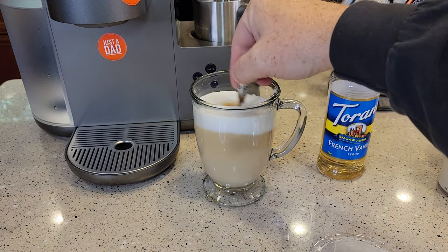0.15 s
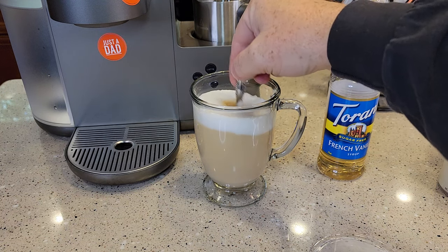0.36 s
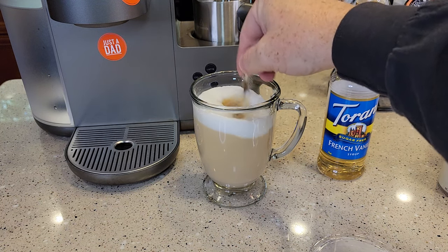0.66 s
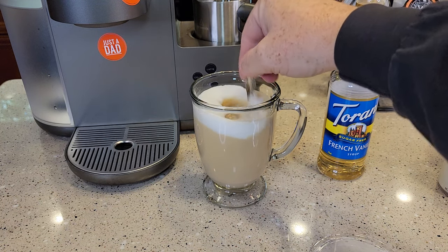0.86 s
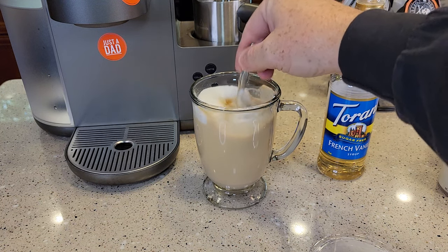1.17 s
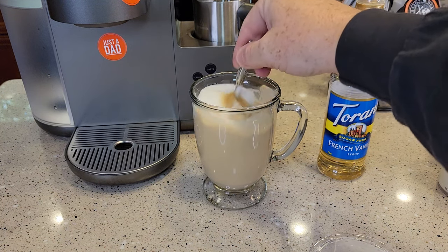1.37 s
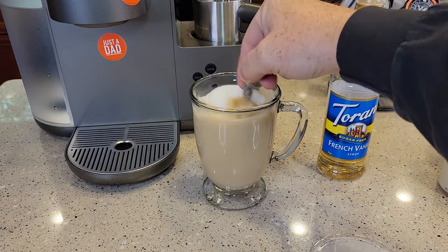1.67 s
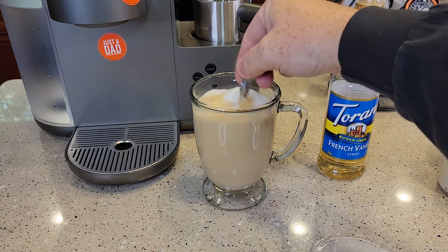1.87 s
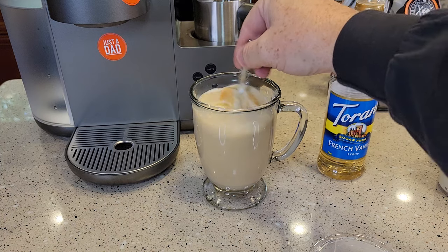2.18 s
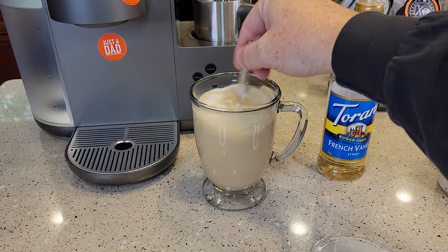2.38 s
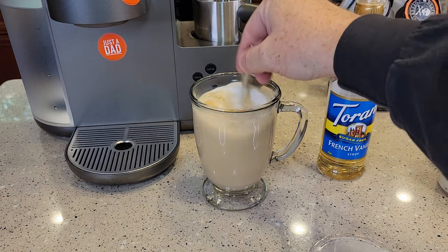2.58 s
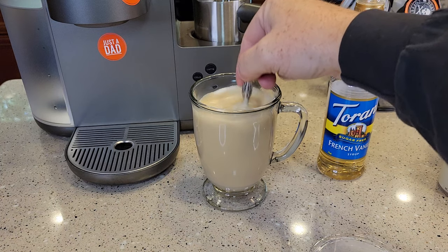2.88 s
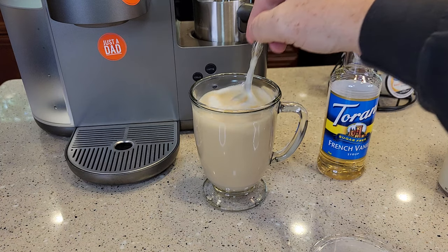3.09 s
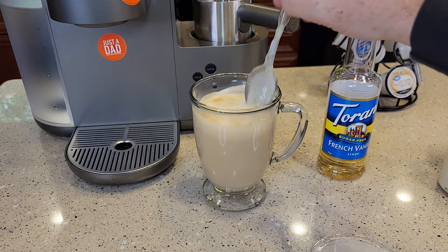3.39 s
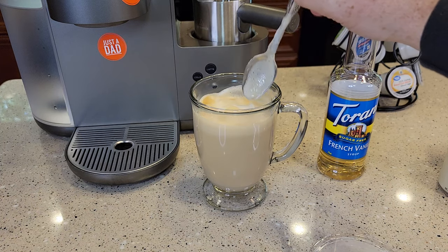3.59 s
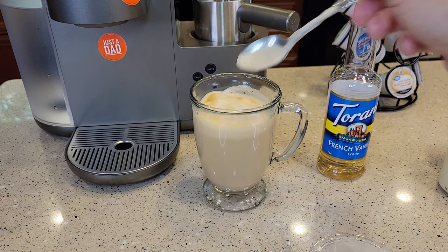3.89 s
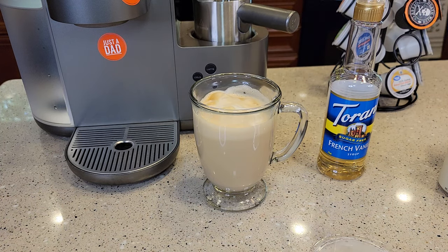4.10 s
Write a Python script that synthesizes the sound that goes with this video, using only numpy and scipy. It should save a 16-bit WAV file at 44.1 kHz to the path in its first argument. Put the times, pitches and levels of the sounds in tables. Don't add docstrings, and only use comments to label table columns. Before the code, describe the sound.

Rapid, damped glassy knocks and small bright ticks as a spoon stirs a full glass mug, ending with three sharper rim taps.

```python
import sys
import numpy as np
from scipy import signal
from scipy.fft import rfft, irfft
from scipy.io import wavfile
from scipy.ndimage import uniform_filter1d

SR = 44100
rng = np.random.default_rng(int(sys.argv[2]) if len(sys.argv) > 2 else 0)


def amplitude_ratio(level_db):
    exponent = np.asarray(level_db, float) / 20
    return 10 ** exponent


def output_pcm(signal):
    pcm = np.clip(np.atleast_2d(signal).T, -1, 1) * 32767
    wavfile.write(sys.argv[1], SR, np.round(pcm).astype(np.int16))


N = 187425

# frequency in Hz, level in dB, t60 in seconds.
THUD_MODES = [(126, -16, 0.058), (300.6, -20, 0.092), (369.2, 2, 0.036), (485.4, 9, 0.033),
              (578, -35, 0.01)]
# start in seconds, wall level in dB, tick level in dB,
# wall note in Hz, upper note of the tick in Hz.
NEAR_HITS = [(0.1095, -29, -44.5, 867, 7760), (0.293, -32, -45, 900, 7600), (0.481, -37, -47.5, 858, 9400),
             (0.6841, -26.5, -39, 899, 6200), (0.86, -25.5, -40, 875, 7300),
             (1.0455, -30, -35.5, 837, 8250), (1.2421, -19, -29, 875, 6730),
             (1.4364, -17.5, -28, 897, 6950), (1.629, -13, -24.5, 877, 6970),
             (1.8308, -6.5, -23, 868, 8540), (2.0301, -18.5, -30, 900, 6500),
             (2.2308, -21.5, -33, 870, 7800), (2.4316, -17.5, -31.5, 882, 6900),
             (2.6065, -21.5, -38.5, 867, 8100), (2.8133, -24.5, -39, 808, 8000)]
# start in seconds, wall level in dB, tick level in dB,
# wall note in Hz, t60 of that note in seconds.
FAR_HITS = [(0.1945, -42, -46, 860, 0.019), (0.408, -36.5, -43, 895, 0.039),
            (0.5675, -47.5, -51, 906, 0.039), (0.7771, -34.5, -42.5, 870, 0.024),
            (0.9626, -26, -35.5, 880, 0.042), (1.1633, -27.5, -39.5, 880, 0.022),
            (1.346, -25, -35.5, 848, 0.026), (1.5352, -24.5, -31, 800, 0.027),
            (1.7254, -25.5, -29.5, 910, 0.026), (1.919, -25.5, -29.5, 880, 0.023),
            (2.1348, -27, -30, 920, 0.018), (2.343, -25, -31.5, 880, 0.054), (2.5381, -21, -33, 900, 0.027),
            (2.7502, -35, -40, 910, 0.037)]
# start in seconds, wall level in dB, tick level in dB.
GRAZES = [(0.4895, -37, -51.5), (0.978, -55, -50), (1.3568, -40, -47), (1.5506, -54, -48),
          (1.7424, -34, -47), (1.9969, -53, -45), (2.0163, -21, -37.5), (2.208, -36, -45),
          (2.221, -33, -41), (2.5529, -37, -45), (2.757, -52, -54), (2.9033, -24, -58),
          (2.9965, -32.5, -67), (4.2278, -82, -61.5)]
THUD_SCATTER_DB = 2.5


def rms_one(x):
    return x / np.sqrt(np.mean(x ** 2) + 1e-20)


def filtered(x, order, hz, kind):
    return signal.sosfilt(signal.butter(order, hz, kind, fs=SR, output="sos"), x)


def coloured(spectrum):
    hz, db = np.transpose(spectrum)
    bins_hz = np.fft.rfftfreq(N, 1 / SR)
    gain = amplitude_ratio(np.interp(np.log(bins_hz + 1), np.log(hz), db, left=-120, right=-120))
    return rms_one(irfft(rfft(rng.standard_normal(N)) * gain, N))


def clicks(times, sizes):
    train = np.full(N, 1e-18)
    places = np.clip((np.asarray(times) * SR).astype(int), 0, N - 1)
    np.add.at(train, places, sizes)
    return train


def ring(x, hz, t60):
    r = amplitude_ratio(-60 / (t60 * SR))
    w = 2 * np.pi * hz / SR
    return signal.lfilter([0, np.sin(w)], [1, -2 * r * np.cos(w), r * r], x)


def struck(times, levels_db, modes, rise_t60, scatter_db):
    out = np.zeros(N)
    chance = rng.standard_normal((len(times), len(modes)))
    for (hz, db, t60), luck in zip(modes, chance.T):
        blows = clicks(times, amplitude_ratio(levels_db + db + scatter_db * luck))
        out += ring(blows, hz, t60) - ring(blows, hz, rise_t60)
    return out


def note(times, levels_db, pitches_hz, t60s, rise_t60):
    out = np.zeros(N)
    age = np.arange(SR // 5) / SR
    starts = (times * SR).astype(int)
    for start, level_db, hz, t60 in zip(starts, levels_db, pitches_hz, t60s):
        shape = amplitude_ratio(-60 * age / t60) - amplitude_ratio(-60 * age / rise_t60)
        sine = np.sin(2 * np.pi * hz * age)
        out[start:start + len(age)] += (amplitude_ratio(level_db) * shape * sine)[:N - start]
    return out


def crack(times, levels_db, low_hz, high_hz, t60):
    fade = signal.lfilter([1], [1, -amplitude_ratio(-60 / (t60 * SR))], clicks(times, amplitude_ratio(levels_db)))
    return filtered(fade * rng.standard_normal(N), 4, [low_hz, high_hz], "band")


def murmur():
    # time in seconds, slosh level in dB.
    swirl = [(0.0, -48.5), (0.25, -67.5), (0.73, -62), (1.08, -58), (1.51, -49), (1.83, -46), (2.1, -49),
             (2.93, -47.5), (3.6, -49.5), (3.86, -60.5), (4.25, -74)]
    # frequency in Hz, level in dB per Hz.
    slosh_spectrum = [(40, -26.5), (150, 4.5), (400, 4), (900, 5.5), (1500, -2), (1830, -20), (1950, -49),
                      (2400, -52)]
    foam_spectrum = [(2400, -1), (3400, 1.5), (4600, 8), (5600, -3.5), (7000, -5.5), (10000, -14.5)]
    hum_spectrum = [(18, -50), (30, -35), (129, -17.5), (160, -8), (300, -6.5), (480, -4.5), (653, -7.5),
                    (2600, -49)]
    air_spectrum = [(1530, -60.5), (2600, -17), (3440, -9), (4890, -5.5), (5310, -4.5), (7260, -16),
                    (14100, -27.5), (16000, -34)]
    hum_db, air_db, flicker_db = -56, -75.5, 2.2
    foam_at_db, foam_follows = -74.5, 1
    s, slosh_db = np.transpose(swirl)
    foam_db = foam_at_db + foam_follows * (slosh_db + 47.5)
    wander = uniform_filter1d(rng.standard_normal(N), size=700)
    flicker = rms_one(uniform_filter1d(wander, size=700))
    t = np.arange(N) / SR
    slosh = coloured(slosh_spectrum) * amplitude_ratio(np.interp(t, s, slosh_db) + flicker_db * flicker)
    foam = coloured(foam_spectrum) * amplitude_ratio(np.interp(t, s, foam_db))
    room = amplitude_ratio(hum_db) * coloured(hum_spectrum) + amplitude_ratio(air_db) * coloured(air_spectrum)
    return room + slosh + foam


def kitchen(x):
    # octave centre in Hz, t60 in seconds, energy of the whole tail in dB.
    octaves = [(200, 0.21, 1), (458, 0.42, -5.5), (910, .38, -18.5), (1970, 0.36, -1.5), (3370, 0.47, -7.5),
               (6500, 0.38, -9.5), (11820, 0.29, -6)]
    first_wall_s, build_up_s = .005, .007
    age = np.arange(int(.7 * SR)) / SR
    onset = np.clip((age - first_wall_s) / build_up_s, 0, 1)
    echo = 0
    for hz, t60, db in octaves:
        noise = filtered(rng.standard_normal(len(age)), 2, [hz / np.sqrt(2), hz * np.sqrt(2)], "band")
        tail = noise * amplitude_ratio(-60 * age / t60) * onset
        echo = echo + amplitude_ratio(db) * tail * np.sqrt(2 * np.log(1000) / t60 / SR)
    return signal.fftconvolve(x, echo)[:N]


def jolts():
    # start in seconds, thud level in dB, deep push in dB relative to the thud.
    foot_jolts = [(0.111, -34, -36), (0.294, -36, -32), (0.6855, -28.5, -37), (1.726, -35, -44),
                  (1.832, -21, -30), (2.032, -21, -52), (2.233, -38, -37), (2.345, -34, -38),
                  (2.61, -31, -35), (2.83, -30, -35), (3.292, -35.5, -15), (3.611, -21.5, -30)]
    push_hz, push_t60_s, push_rise_s = 36, .15, .03
    s, thud_db, push_db = np.transpose(foot_jolts)
    thud = struck(s, thud_db - 5.0, THUD_MODES, 0.005, scatter_db=THUD_SCATTER_DB)
    blows = clicks(s, amplitude_ratio(thud_db + push_db))
    push = ring(blows, push_hz, push_t60_s) - ring(blows, push_hz, push_rise_s)
    return filtered(thud, 3, 170, "high") + push


def touches(rows, kind):
    shares = {"near": (-8.5, -10), "far": (-18.5, -12), "graze": (-28.5, -10), "bump": (-13.5, -44),
              "drag": (-17, -5.5)}
    loud_wall_db, upper_per_db, thud_per_db = -17.5, -0.25, 0.08
    s, wall_db, hz, t60 = np.transpose(rows)
    force_db = wall_db - loud_wall_db
    upper_db = shares[kind][0] + upper_per_db * force_db
    thud_db = shares[kind][1] + thud_per_db * force_db
    return np.transpose([s, wall_db, upper_db, thud_db, hz, t60])


def all_knocks():
    # start in seconds, wall level in dB, wall note in Hz, t60 in seconds.
    bumps = [(0.126, -36.5, 905, 0.038), (0.168, -41, 884, 0.013), (0.365, -38.5, 880, 0.069),
             (0.445, -42.5, 870, 0.042), (0.515, -39, 885, .06), (0.64, -44, 880, 0.033),
             (0.665, -53, 880, 0.06), (0.829, -30.5, 853, 0.048), (0.932, -29.5, 880, 0.052),
             (1.025, -24, 876, 0.063), (1.054, -25, 868, 0.083), (1.115, -31, 850, .054),
             (1.202, -28, 863, 0.091), (1.308, -28, 860, 0.052), (1.398, -33.5, 900, 0.091),
             (1.505, -24.5, 877, 0.034), (1.596, -21.5, 890, 0.059), (1.699, -22, 872, 0.039),
             (1.79, -21.5, 880, 0.041), (1.938, -36, 920, 0.039), (1.994, -19.5, 881, 0.089),
             (2.197, -24, 906, 0.035), (2.296, -37.5, 867, 0.056), (2.332, -34, 890, 0.055),
             (2.399, -23, 870, 0.069), (2.599, -23, 828, 0.087), (2.726, -37.5, 910, .042),
             (2.793, -26, 870, 0.083)]
    # start in seconds, wall level in dB.
    drags = [(2.69, -50), (2.828, -36.5), (2.855, -44), (2.939, -33), (2.954, -32), (3.016, -34.5),
             (3.038, -39), (3.062, -33.5), (3.103, -37.5), (3.138, -42), (3.166, -44)]
    # start in seconds, wall level in dB, upper modes in dB and
    # counter thud in dB relative to the wall, t60 in seconds.
    rim_knocks = [
        (3.291, -8, -14, -22.5, 0.058),
        (3.453, -11, -5, -10.5, 0.063),
        (3.6088, -8.5, -7, -0.5, 0.016),
        (3.6135, -8.5, -11, -15, 0.034),
        (3.654, -34.5, 10, -4, .04),
    ]
    wall_lag_s, near_t60_s, rim_hz = 0.001048, 0.049, 859
    wall_hz, wall_t60_s = 870.5, .055
    near = [(s + wall_lag_s, db, hz, near_t60_s) for s, db, _, hz, _ in NEAR_HITS]
    far = [(s + wall_lag_s, db, hz, t60) for s, db, _, hz, t60 in FAR_HITS]
    graze = [(s, db, wall_hz, wall_t60_s) for s, db, _ in GRAZES]
    drag = [(s, db, wall_hz, wall_t60_s) for s, db in drags]
    rim = [(*row[:4], rim_hz, row[4]) for row in rim_knocks]
    return np.vstack([touches(near, "near"), touches(far, "far"), touches(graze, "graze"),
                      touches(bumps, "bump"), touches(drag, "drag"), rim])


def knocks():
    # frequency in Hz, level in dB, t60 in seconds.
    wall_modes = [(716, -14.5, 0.097), (880, 3, 0.014), (1000, -14.5, 0.11)]
    upper_modes = [(1044, -5, 0.032), (1196, 4.5, 0.037), (1286.6, 3, 0.029), (1445, -22, 0.048),
                   (1655, -3, 0.026)]
    s, wall_db, upper_db, thud_db, hz, t60 = all_knocks().T
    s = s - .001
    wall = note(s, wall_db + 3.0, hz, t60, 0.0072)
    wall += struck(s, wall_db, wall_modes, 0.0036, scatter_db=3)
    upper = struck(s, wall_db + upper_db + 2.5, upper_modes, 0.0095, scatter_db=4.0)
    thud = struck(s, wall_db + thud_db, THUD_MODES, 0.019, scatter_db=THUD_SCATTER_DB)
    return filtered(wall + upper + thud, 4, [120, 1750], "band")


def all_ticks(loud_tick_db):
    near_note_hz, far_notes_hz, graze_notes_hz, note_spread = 4505, (5040, 9130), (5200, 6500), 0.028
    top_base_db, top_per_db, top_far_db = -8.5, 1.1, 1
    low_near_db, low_far_db, low_graze_db, low_per_db = -9.5, -9.5, 1.5, .5
    dulling_db_per_s = -3.5
    rows = [(s, db, near_note_hz, hz, 0, low_near_db) for s, _, db, _, hz in NEAR_HITS]
    rows += [(row[0], row[2], *far_notes_hz, top_far_db, low_far_db) for row in FAR_HITS]
    rows += [(s, db, *graze_notes_hz, top_far_db, low_graze_db) for s, _, db in GRAZES]
    s, peak_db, hz, upper_hz, extra_db, low_db = np.transpose(rows)
    spread = 1 + note_spread * rng.standard_normal((len(s), 2)).T
    force_db = peak_db - loud_tick_db
    top_db = top_base_db + extra_db + top_per_db * force_db + dulling_db_per_s * (s - 1.5)
    return s, peak_db, hz * spread[0], upper_hz * spread[1], top_db, low_db + low_per_db * force_db


def ticks():
    # frequency in Hz, level in dB, t60 in seconds.
    glass_modes = [(4300, -8, .006), (4700, -7, .006), (5400, -8, .006), (6300, -11, .005),
                   (7500, -9, .005)]
    glass_top = [(8900, 0, .005), (10000, -3, .006), (11000, -4, .005), (12800, -8, .004),
                 (14500, -12, .004)]
    glass_low = [(1993, 5.5, 0.015), (2160, 4.5, 0.019), (2520, -25, 0.0027), (2690, -1, 0.0071)]
    loud_tick_db, wash_base_db, wash_per_db = -26, -11.5, 3.8
    s, peak_db, hz, upper_hz, top_db, low_db = all_ticks(loud_tick_db)
    note_t60_s = np.full(len(s), .007)
    out = note(s, peak_db + 7.0, hz, note_t60_s, 0.0018)
    out += note(s, peak_db + 0.5, upper_hz, note_t60_s, 0.00047)
    out += struck(s, peak_db - 44, glass_modes, 0.0013, scatter_db=5)
    out += struck(s, peak_db + top_db - 0.5, glass_top, 0.00074, scatter_db=-1)
    out += struck(s, peak_db + low_db + 0.5, glass_low, 0.0051, scatter_db=THUD_SCATTER_DB)
    out += crack(s, peak_db - 5.0, 3730, 7720, 0.04)
    out += crack(s, peak_db + top_db + 1.5, 4300, 13300, 0.048)
    wash_db = wash_base_db + wash_per_db * (peak_db - loud_tick_db)
    out += crack(s, peak_db + wash_db, 2500, 4200, 0.034)
    rattle = crack(s, peak_db - 10.0, 2100, 9100, 0.07)
    return out + rattle


def taps():
    # start in seconds, peak level in dB, top in dB relative to the peak.
    rim_taps = [
        (3.2897, -16.5, -12.5),
        (3.451, -17.5, -3),
        (3.6082, -13, -10),
    ]
    # frequency in Hz, level in dB, t60 in seconds.
    spoon_modes = [(2120, -5, 0.014), (2263, -7, 0.016), (2530, -4.5, 0.014), (2860, -8, .012),
                   (4190, -8.5, 0.038), (4560, -7.5, 0.02), (4850, -4.5, .01), (5550, -6, .025),
                   (5530, -7, .025), (5700, -13.5, 0.0084), (7215, -6, 0.028), (7400, -3.5, .012),
                   (7620, -10, 0.02)]
    spoon_top = [(8300, -1.5, .008), (8860, -1.5, .01), (9300, -3, .008), (9630, -4, .02), (9950, -3, .014),
                 (10950, -11, .015), (12500, -13, .008), (13450, -11, .02), (15000, -12, .006)]
    scatter_db = 1.5
    s, peak_db, top_db = np.transpose(rim_taps)
    out = struck(s, peak_db - 4.5, spoon_modes, 0.0026, scatter_db)
    out += struck(s, peak_db + top_db + 0.5, spoon_top, 0.0055, scatter_db)
    out += crack(s, peak_db - 8.5, 1600, 6500, 0.011)
    out += crack(s, peak_db + top_db + 4.5, 7000, 11000, 0.011)
    out += crack(s, peak_db - 19.0, 2200, 5300, 0.044)
    out += crack(s, peak_db - 18.0, 7000, 9700, .05)
    out += crack(s, peak_db - 15.0, 11000, 15800, 0.013)
    buzz = crack(s, peak_db - 30.0, 1800, 8600, .07)
    for hz, db, t60 in spoon_modes + spoon_top:
        out += amplitude_ratio(db) * ring(buzz, hz, t60)
    return out


def scene():
    mug = knocks() + ticks() + taps() + jolts()
    return (mug + kitchen(mug) + murmur())[None]


def low_pass(x):
    return signal.sosfilt(signal.butter(12, 16650, fs=SR, output="sos"), x)


def record(dry):
    x = filtered(dry, 1, 60, "high")
    x = signal.sosfilt(signal.cheby2(10, 30, 16300, fs=SR, output="sos"), x)
    return low_pass(x)


dry = scene()
out = record(dry)
output_pcm(out)
```